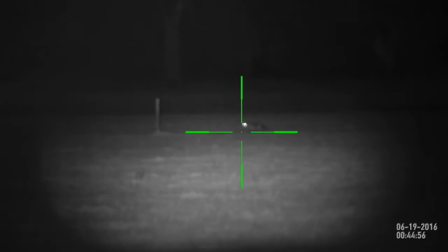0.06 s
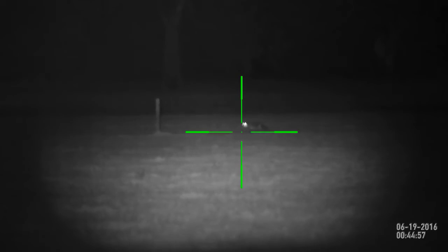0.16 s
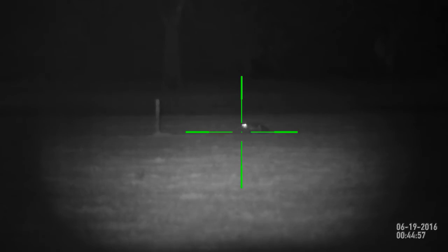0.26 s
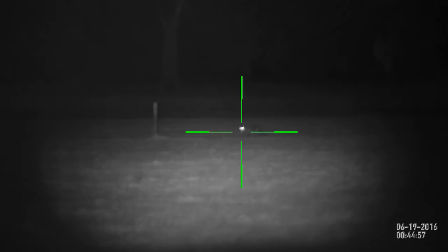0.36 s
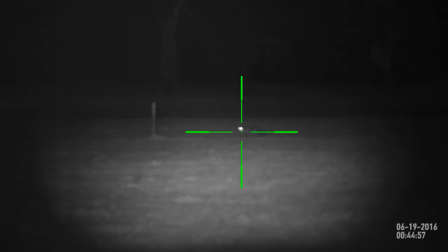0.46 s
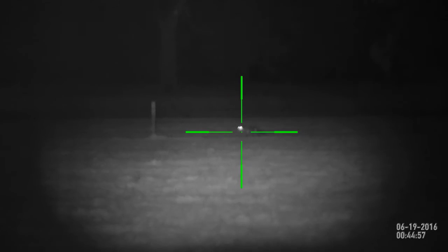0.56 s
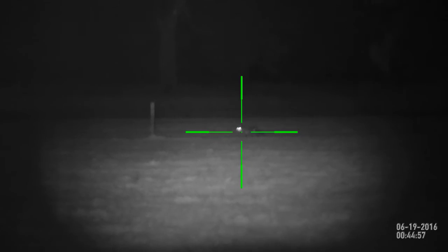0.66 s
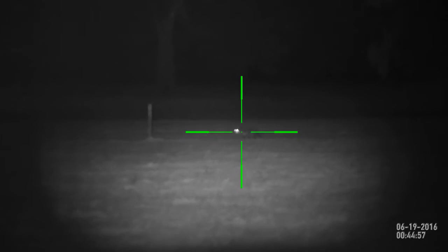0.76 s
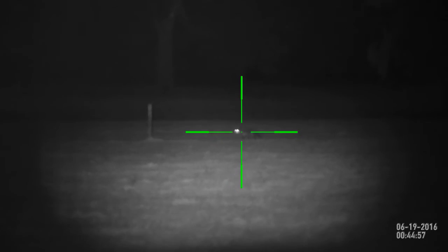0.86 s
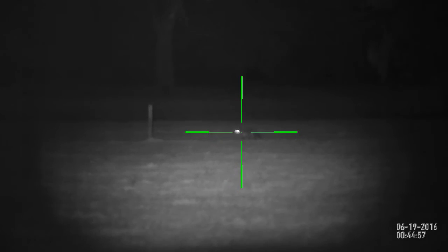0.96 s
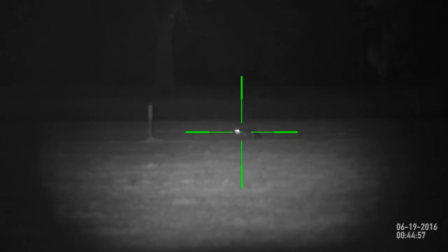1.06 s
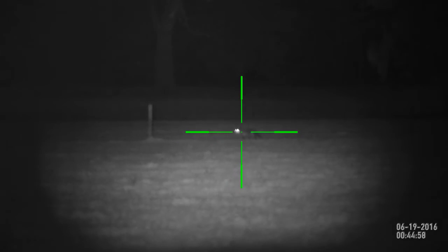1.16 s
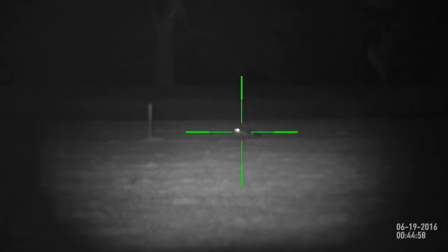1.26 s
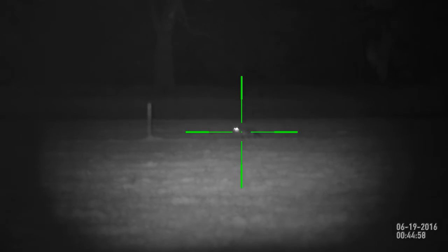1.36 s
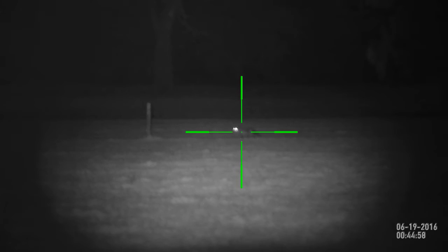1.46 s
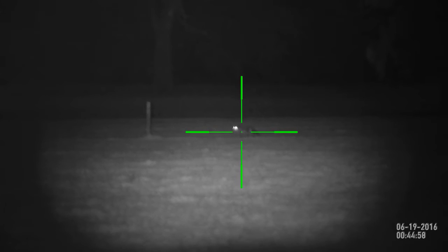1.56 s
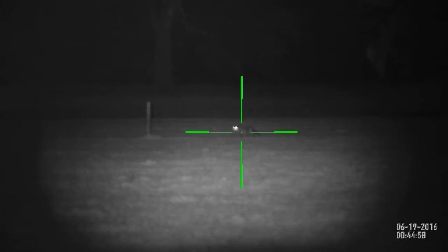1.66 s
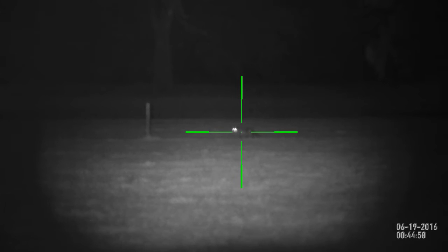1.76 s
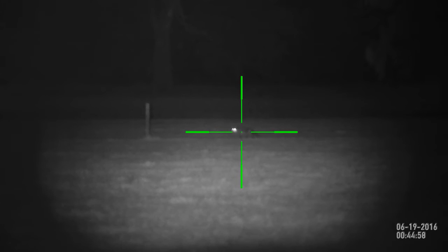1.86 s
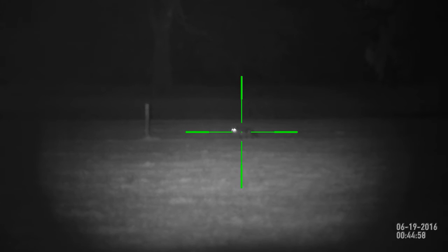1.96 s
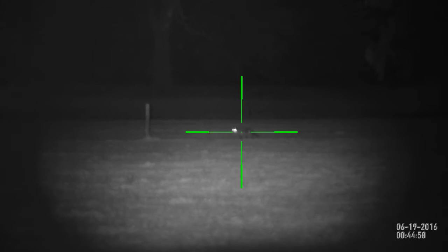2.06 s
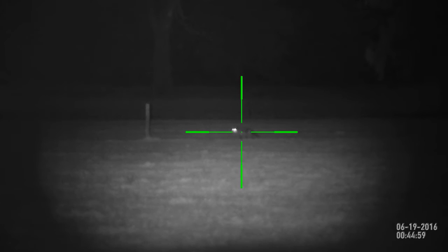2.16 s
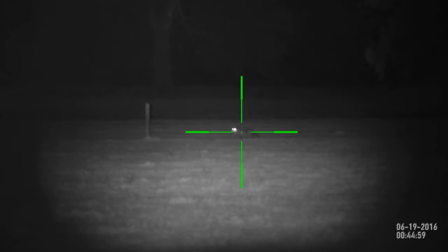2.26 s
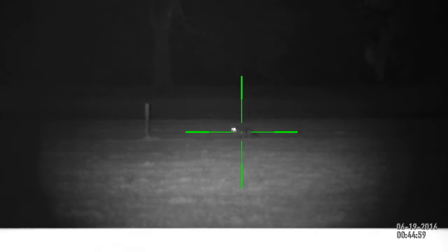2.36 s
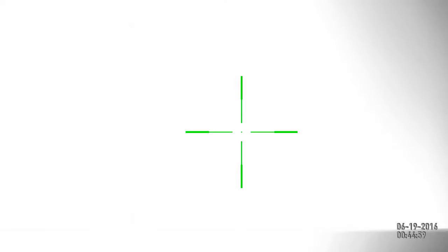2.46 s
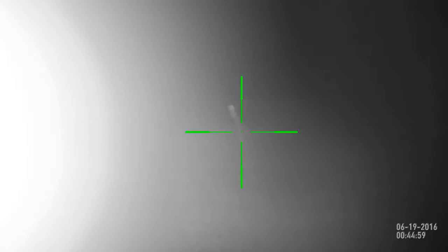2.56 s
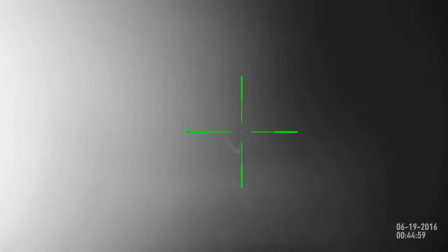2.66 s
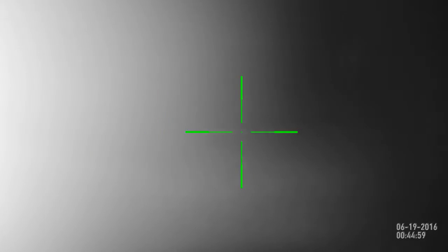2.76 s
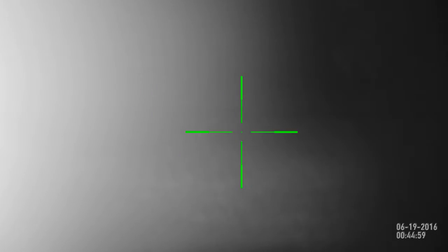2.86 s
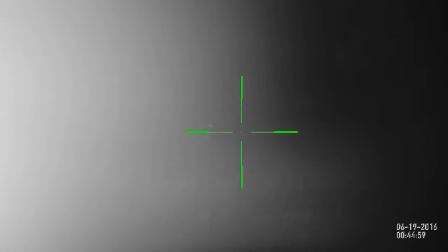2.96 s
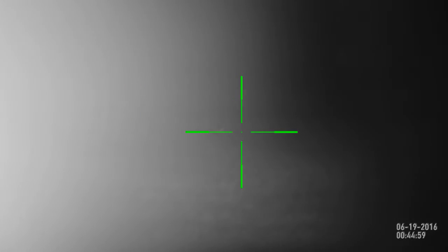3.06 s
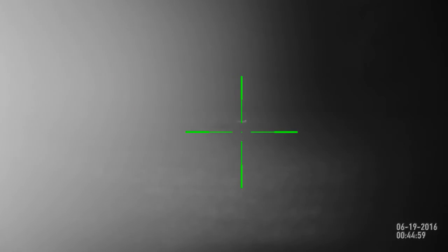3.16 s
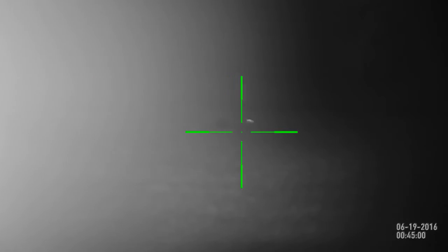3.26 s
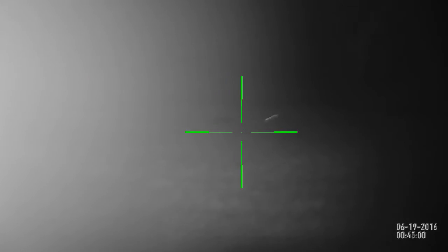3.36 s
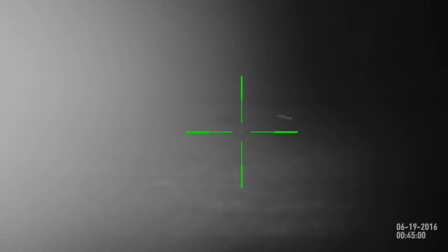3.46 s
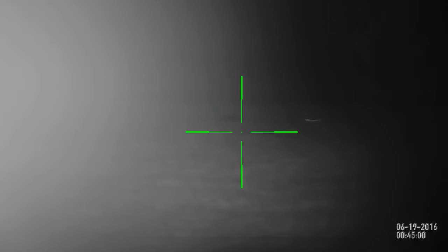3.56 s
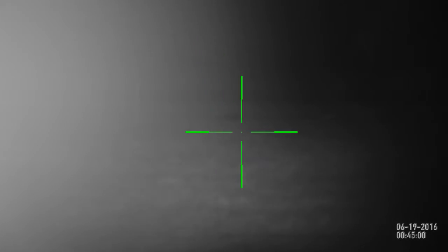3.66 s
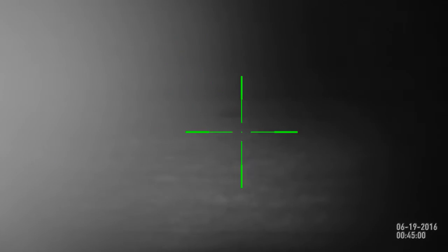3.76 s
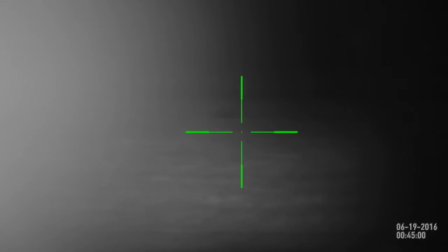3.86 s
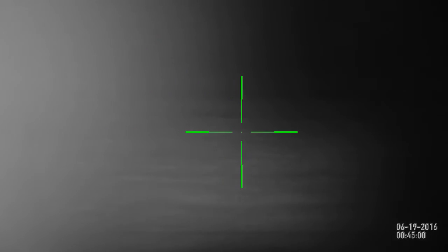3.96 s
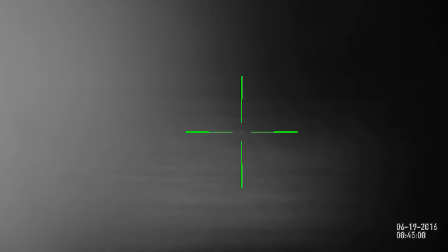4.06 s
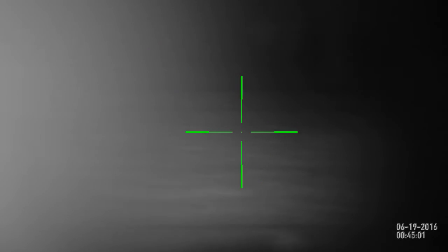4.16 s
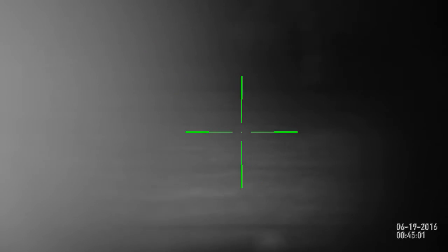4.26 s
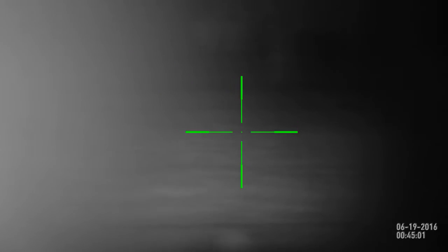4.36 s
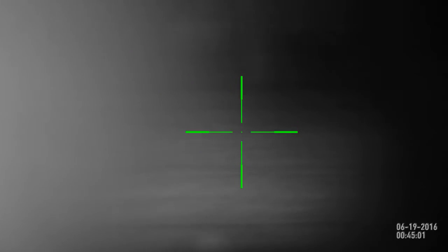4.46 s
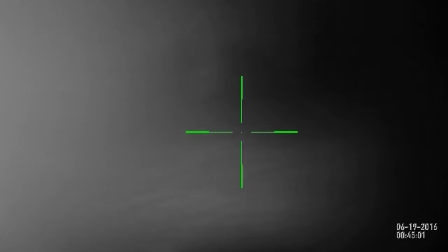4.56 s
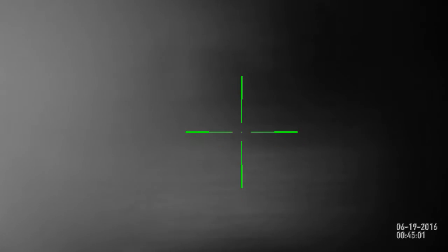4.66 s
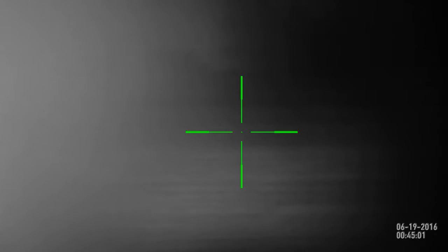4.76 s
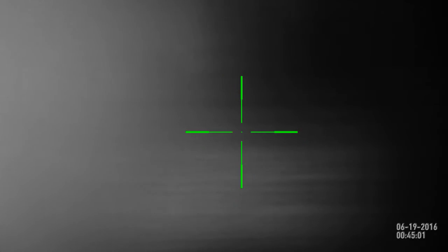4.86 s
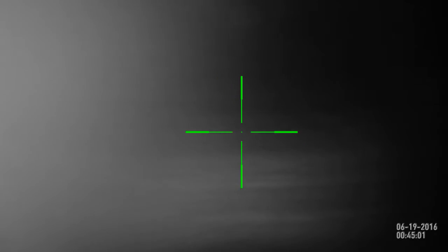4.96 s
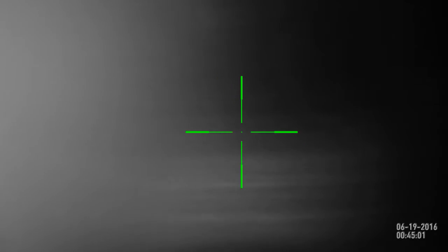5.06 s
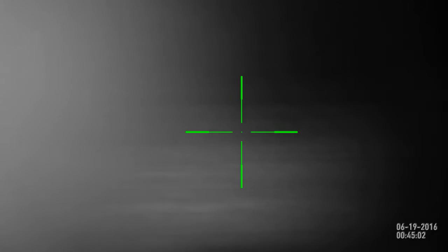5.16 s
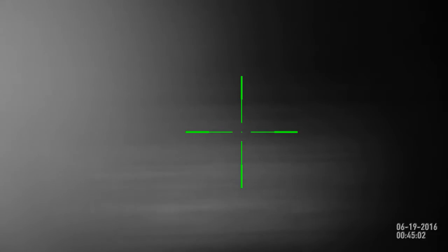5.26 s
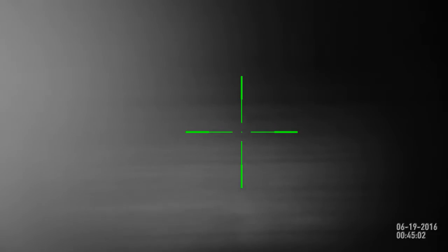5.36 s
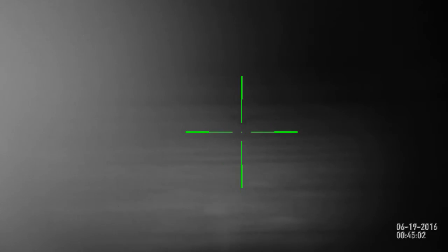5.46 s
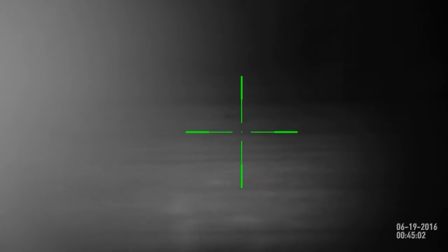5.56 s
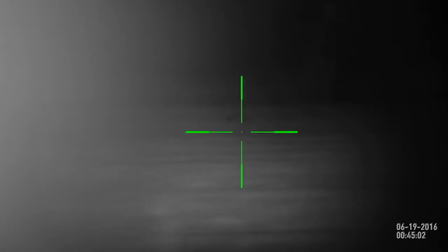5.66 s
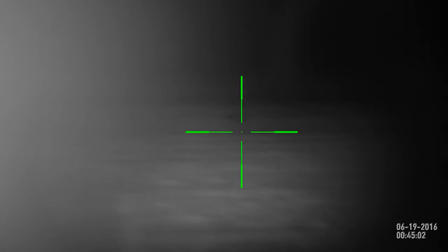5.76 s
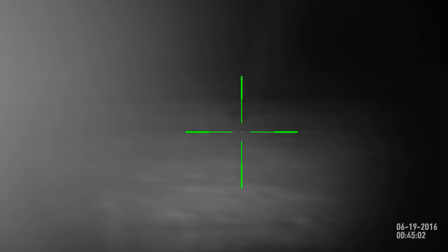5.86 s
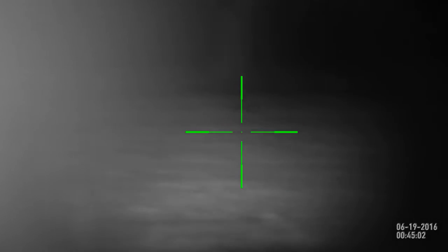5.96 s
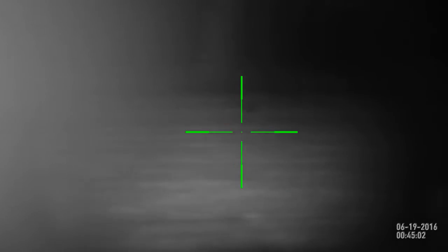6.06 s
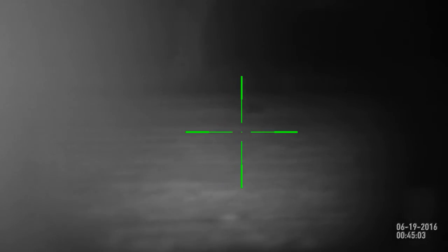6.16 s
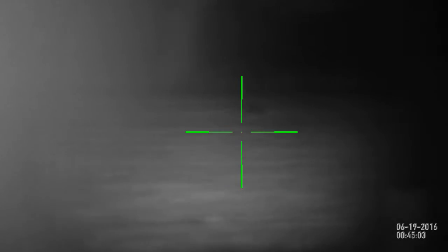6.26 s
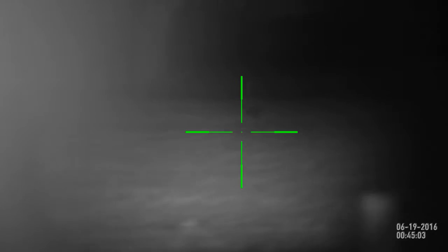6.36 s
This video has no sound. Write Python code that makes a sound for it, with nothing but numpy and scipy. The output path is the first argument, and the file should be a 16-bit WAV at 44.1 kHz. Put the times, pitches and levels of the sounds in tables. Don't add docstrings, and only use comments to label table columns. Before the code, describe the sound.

Faint hoarse animal squeals over hiss and thin electronic whine at night, then one overloaded close rifle shot whose echo rolls away, followed by tiny metal ticks.

```python
import sys
import numpy as np
from scipy import signal
from scipy.fft import rfft, irfft, next_fast_len
from scipy.io import wavfile
from scipy.ndimage import uniform_filter1d, map_coordinates

SR = 44100
rng = np.random.default_rng(int(sys.argv[2]) if len(sys.argv) > 2 else 0)


def bounce(signal):
    frames = np.transpose(np.atleast_2d(signal))
    limited = np.clip(frames, -1, 1)
    pcm = np.round(limited * 32767).astype(np.int16)
    wavfile.write(sys.argv[1], SR, pcm)


def elevation(decibels):
    levels = np.asarray(decibels, float)
    return 10 ** (levels / 20)


N = 282240
T = np.arange(N) / SR
SHOT_S = 2.4675

# (time [s], peak level [dB], pitch [Hz], length [cycles])
SLAPS = [(2.625, -32.5, 1170, 1.5), (2.724, -30.5, 3120, 3), (2.752, -24.5, 2100, 2), (2.814, -29, 1350, 3),
         (2.874, -29.5, 1204, 4.4), (2.916, -30, 1270, 3.4), (3.0205, -14, 2220, 1.9),
         (3.08, -27, 1035, 3.3), (3.128, -31, 1156, 6.5), (3.162, -29, 1320, 3.2), (3.236, -26.5, 716, 2),
         (3.256, -26.5, 2600, 5), (3.325, -33.5, 1380, 1.6), (3.46, -37, 2000, 5), (3.542, -37, 1080, 4),
         (3.611, -42, 976, 5.6), (4.009, -40, 1190, 6), (4.1, -44, 1093, 4.5), (4.165, -44, 1100, 5),
         (4.325, -39.5, 1057, 2.7), (4.463, -43, 814, 2.99), (4.372, -45, 847, 3.5), (4.655, -47, 767, 4),
         (4.736, -49.5, 1698, 2.7), (4.8, -45.5, 1100, 2.7), (4.835, -47, 1260, 2.7),
         (5.232, -46.5, 1150, 4), (5.312, -46.5, 1950, 8.2), (5.325, -43, 1404, 8),
         (5.363, -42, 1160, 2.74)]


def unit(x):
    return x / np.sqrt(np.mean(x ** 2) + 1e-20)


def along(points, hz):
    f, v = np.transpose(points)
    return np.interp(np.log(hz + 1), np.log(f + 1), v)


def curves(rows, t):
    s, *cols = np.transpose(rows)
    return [np.interp(t, s, c) for c in cols]


def during(rows, fade):
    since_start = T - rows[0][0]
    until_end = rows[-1][0] - T
    return np.clip(np.minimum(since_start, until_end) / fade, 0, 1)


def wobble(rate):
    knots = rng.standard_normal(int(N * rate / SR) + 4)
    return map_coordinates(knots, [T * rate])


def noise(gain):
    m = next_fast_len(N)
    spectrum = rfft(rng.standard_normal(m)) * gain(np.fft.rfftfreq(m, 1 / SR))
    return unit(irfft(spectrum, m)[:N])


def hump(hz, width_hz):
    return lambda f: f * width_hz / np.abs(hz ** 2 - f ** 2 + 1j * f * width_hz)


def high_pass(x, order, hz):
    return signal.sosfilt(signal.butter(order, hz, 'high', fs=SR, output='sos'), x)


def add(out, s, x):
    part = out[round(s * SR):][:len(x)]
    part += x[:len(part)]


def rumble():
    # (frequency [Hz], density [dB per Hz])
    apart = [(20, -2), (60, -7), (150, -16), (700, -28.5), (3000, -31), (15000, -35.5)]
    lumps = elevation(1.9 * wobble(6.7)) * noise(lambda f: hump(38, 60)(f) ** 2)
    lows = elevation(4.5 * wobble(25)) * noise(lambda f: elevation(along(apart, f)) / (1 + (f / 900) ** 4))
    highs = noise(lambda f: elevation(along(apart, f)) / (1 + (900 / (f + 1)) ** 4))
    flicker = elevation(-76) * lows + elevation(-81) * highs
    return elevation(-78) * lumps + flicker * np.array([[1], [-1]])


def electronics():
    # (frequency [Hz], density [dB per Hz])
    hiss_colour = [(20, -2.5), (64, -21), (150, -18), (700, -16), (2600, -27), (5000, -31), (15200, -32.5),
                   (15600, -62)]
    # (frequency [Hz], level [dB])
    whine = [(500.6, -79), (721.4, -80.5), (1001, -74), (1437, -81), (1717, -89), (2003, -83),
             (2998, -87.5), (4000, -89), (4221, -92), (6998, -90.5), (8000, -91.5), (10142, -93.5),
             (13921, -85.5), (13980, -81)]
    # (middle time [s], length [s])
    pauses = [(0.234, 0.039), (0.752, 0.085), (1.234, 0.028), (1.742, .06), (2.388, 0.033), (5.757, 0.087)]
    hiss_db = -67
    busy = np.ones(N)
    for s, length in pauses:
        busy *= np.clip((np.abs(T - s) - length / 2) / 0.0056, .15, 1)
    hiss = noise(lambda f: elevation(along(hiss_colour, f)) * (1 - 0.1 * (f < 2500)))
    out = elevation(hiss_db + 1.42 + 0.49 * wobble(15)) * hiss
    out = out + elevation(hiss_db - 9) * busy * noise(hump(700, 1200))
    for hz, db in whine:
        phase = 2 * np.pi * hz * T + .3 * wobble(45)
        tone = elevation(db + 5.0 + 0.81 * wobble(12)) * np.sin(phase)
        out = out + tone * (busy if hz < 2500 else 1)
    return out


def squeal():
    # (time [s], pitch [Hz], effort [dB])
    calls = [
        [(0, 2230, -64), (.1, 2170, -62.5), (.17, 2120, -72), (.24, 2063, -59.5), (.33, 2010, -68),
         (.4, 2010, -63.5), (.46, 1570, -74)],
        [(.58, 1630, -70), (.63, 1660, -66), (.7, 1730, -67)],
        [(.74, 2000, -68), (.82, 2047, -61.5), (.95, 2020, -68.5), (1.03, 2066, -60), (1.1, 1830, -71),
         (1.2, 1690, -65), (1.26, 1610, -80)],
        [(1.4, 1570, -76), (1.47, 1629, -66.5), (1.55, 1700, -69), (1.7, 1713, -67), (1.87, 1680, -68.5),
         (1.97, 1550, -69.5), (2.02, 1500, -79)],
        [(2.25, 1647, -64), (2.3, 1621, -69), (2.45, 1550, -71.5)],
        [(5.43, 2220, -76.5), (5.49, 2285, -67), (5.57, 2434, -71.5), (5.67, 2660, -67.5), (5.75, 2550, -76),
         (5.81, 2610, -70), (5.86, 2230, -66), (5.99, 1930, -72.5)],
        [(6.09, 2440, -81), (6.15, 2290, -67), (6.2, 2230, -77), (6.3, 2534, -65.5), (6.4, 2540, -78)],
    ]
    resonance_levels = [-12.5, -17, -15, -20, -17, -11.5, -7]
    # (pitch [Hz], rasp level [dB])
    rasp_levels = [(1600, 6), (1720, -3), (2050, -7), (2600, -2)]
    # (pitch [Hz], slip [share of pitch])
    waver = [(1600, 0.0146), (2100, 0.019), (2600, 0.046)]

    rasp = noise(lambda f: hump(1700, 500)(f) ** 2 + hump(2100, 400)(f) ** 2 + 0.5 * hump(2650, 600)(f) ** 2)
    rasp = rasp * elevation(1.8 * wobble(30.07))
    resonance = noise(lambda f: hump(4220, 130)(f) ** 2) * elevation(4 * wobble(22))
    resonance = resonance + 0.77 * noise(lambda f: hump(4550, 200)(f) ** 2) * elevation(5 * wobble(19))
    upper = .5 * noise(lambda f: hump(4780, 150)(f) ** 2)
    upper = upper + 0.54 * noise(lambda f: hump(6400, 450)(f) ** 2)
    resonance = resonance + upper * elevation(3.9 * wobble(16))
    out = np.zeros(N)
    for rows, resonance_db in zip(calls, resonance_levels):
        hz, db = curves(rows, T)
        rasp_db = along(rasp_levels, hz)
        phase = 2 * np.pi * np.cumsum(hz * (1 + along(waver, hz) * wobble(33))) / SR
        tone = unit((1.1 + wobble(190)) * elevation(1.8 * wobble(28)) * np.sin(phase))
        loose_fold = elevation(-10 + 5.7 * wobble(16)) * wobble(200) * np.sin(phase)
        voice = tone + loose_fold + elevation(rasp_db) * rasp + elevation(resonance_db) * resonance
        out += elevation(db - 3.0) * during(rows, fade=0.019) * voice
    return out


def ticks():
    # (time [s], peak level [dB], ring [Hz])
    clicks = [
        (4.8494, -62, 3400),
        (5.5594, -62, 6200),
        (5.8194, -55.5, 3747),
        (5.878, -56, 3734),
        (5.9494, -53.5, 3648),
    ]
    out, t = np.zeros(N), np.arange(SR // 50) / SR
    for s, db, hz in clicks:
        crack = 1.2 * elevation(-60 * t / .004) * rng.standard_normal(len(t))
        ring = elevation(-60 * t / 0.022) * np.sin(2 * np.pi * hz * t)
        add(out, s, elevation(db - 5.0) * (ring + crack))
    return out


def echo():
    # (time [s], level [dB])
    slope_levels = [(2.5, -46.5), (2.53, -50), (2.64, -41.5), (2.75, -40.5), (2.89, -50), (3.18, -46.5),
                    (3.23, -48), (3.33, -44), (3.39, -53), (3.47, -50.5), (3.87, -50.5), (3.94, -54.5),
                    (4.24, -49.5), (4.6, -60), (4.9, -57.5), (5.26, -59.5), (5.34, -56), (5.8, -69.5)]
    # (time [s], level [dB])
    brush_levels = [
        (2.5, -46),
        (2.74, -33),
        (2.82, -35.5),
        (2.88, -30.5),
        (3.17, -32.5),
        (3.22, -40.5),
        (3.3, -34.5),
        (3.4, -54),
        (3.8, -48.5),
    ]
    # (frequency [Hz], gain [dB])
    land_colours = [
        [(400, -13), (700, 3.5), (1300, 5.5), (2400, 3), (3500, -12.5), (5000, -38)],
        [(1800, -26.5), (3000, -5), (6200, -1.5), (8500, -2), (10500, -18), (13000, -35)],
        [(8000, -26), (10000, 0.5), (13000, -2), (16000, -8)],
        [(60, -39), (110, -12), (200, -2), (350, -0.5), (600, -24)],
    ]
    # (frequency [Hz], width [Hz], level [dB])
    trunks = [(3920, 210, -3), (5240, 100, -1.5), (6400, 170, -1.5), (7350, 150, 0), (9200, 172.3, -6)]
    clump_db, clump_t60_s = -18.5, 0.074
    brush_fall_db_per_s = 23.5
    brush_follows = 0.22
    air_db, air_fade_db_per_s, bass_db, bass_fade_db_per_s = 2, 39.5, -11, 5
    absorb_db_per_s, absorb_power = 27, 1.6

    big_returns = np.minimum(rng.exponential(size=N), 4) * (rng.random(N) < .02)
    sizes = elevation(3.4 * big_returns + 0.9 * wobble(70))
    hz, t, z = signal.stft(unit(sizes * rng.standard_normal(N)), SR, nperseg=256)
    patches = uniform_filter1d(rng.standard_normal(z.shape), size=5, axis=0)
    patches = uniform_filter1d(patches, size=5, axis=1)
    bands = uniform_filter1d(rng.standard_normal(z.shape), size=90, axis=1)
    age = np.maximum(t - SHOT_S, 0)

    clumps = sum(elevation(db + clump_db - 60 * np.abs(t - s) / clump_t60_s) * (t >= s) for s, db, *_ in SLAPS)
    slopes = elevation(curves(slope_levels, t)[0]) + clumps
    past_trees = np.maximum(t - brush_levels[-1][0], 0)
    brush = elevation(curves(brush_levels, t)[0] - brush_fall_db_per_s * past_trees)
    brush = brush * (slopes / (slopes - clumps)) ** brush_follows
    top = brush * elevation(air_db - air_fade_db_per_s * age)
    bass = slopes * elevation(bass_db - bass_fade_db_per_s * age + 3.6 * np.interp(t, T, wobble(9)))

    levels = [slopes, brush, top, bass]
    land = sum(np.outer(unit(elevation(along(colour, hz))), level) for colour, level in zip(land_colours, levels))
    absorbed_db = absorb_db_per_s * np.outer((hz / 10000) ** absorb_power, age)
    land = land * elevation(2.1 * unit(patches) + 0.47 * unit(bands) - absorbed_db)
    favoured = sum(elevation(db) * hump(c, w)(hz) ** 2 for c, w, db in trunks)
    land = land * (1 + .7 * favoured)[:, None]
    rolling = signal.istft(z * land, SR, nperseg=256)[1][:N]
    return high_pass(rolling * during(slope_levels, fade=.015), 4, 130)


def slaps():
    dulls_db_per_s = 3.5
    out, t = np.zeros(N), np.arange(SR // 20) / SR
    for s, db, hz, cycles in SLAPS:
        u = t * hz / cycles
        sweep = 2 * np.pi * hz * t * (0.907 + 0.055 * u) + rng.uniform(0, 2 * np.pi)
        upper = 0.53 * np.sin(1.6 * sweep) + .4 * np.exp(-3 * u) * np.sin(2.7 * sweep)
        partials = np.sin(sweep) + 0.32 * np.sin(0.603 * sweep)
        partials = partials + elevation(-dulls_db_per_s * (s - SHOT_S)) * upper
        add(out, s, elevation(db + 8) * u ** 0.73 * np.exp(-1.5 * u) * partials)
    return high_pass(out, 2, 300)


def shot():
    # (time [s], level [dB])
    blast = [
        (2.4675, -44.5),
        (2.4686, -12),
        (2.4703, -5.5),
        (2.4708, 7),
        (2.4765, 5.5),
        (2.4795, -11.5),
        (2.484, -20),
        (2.5, -30),
        (2.53, -46.5),
    ]
    # (frequency [Hz], density [dB per Hz])
    muzzle = [(180, -40.5), (300, -15.5), (602, -2.5), (2720, 0), (3990, -6), (4410, -0.5), (7740, -10.5),
              (15800, -16.5)]
    # (frequency [Hz], level [dB], t60 [s])
    barrel = [(201, -7.5, 0.035), (639, -1, 0.028), (1080, 5, .014)]
    push_s = 2.4707
    sizzle_base_db, sizzle_peak_db, sizzle_peak_s, sizzle_width_s = 0.5, 9, 2.4785, 0.0018

    blast_db, = curves(blast, T)
    bark = noise(lambda f: elevation(along(muzzle, f)) / (1 + (f / 5000) ** 4))
    sizzle = noise(lambda f: elevation(along(muzzle, f)) / (1 + (5000 / (f + 1)) ** 4))
    sizzle_db = sizzle_base_db + sizzle_peak_db * np.exp(-((T - sizzle_peak_s) / sizzle_width_s) ** 2)
    jet = elevation(blast_db - 1.5) * during(blast, fade=.0005) * (bark + elevation(sizzle_db) * sizzle)
    t = np.maximum(T - push_s, 0)
    push = sum(elevation(db - 60 * t / t60) * np.sin(2 * np.pi * hz * t) for hz, db, t60 in barrel)
    return jet + push


def scene():
    mono = electronics() + squeal() + ticks() + echo() + slaps() + shot()
    return rumble() + mono * elevation([[.12], [-.12]])


def low_pass(x):
    return signal.sosfilt(signal.butter(12, 15950, fs=SR, output="sos"), x)


def record(dry):
    duck = np.interp(T, [2.444, 2.449, 2.466, 2.4672], [0.88, .05, .05, 0.98])
    clipped = duck * dry / (1 + np.abs(dry / .98) ** 8) ** (1 / 8)
    return low_pass(clipped)


dry = scene()
out = record(dry)
bounce(out)
```